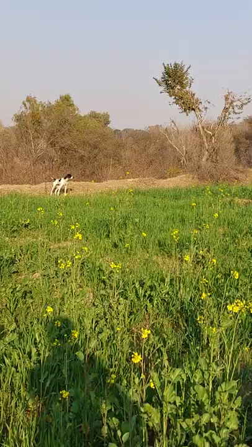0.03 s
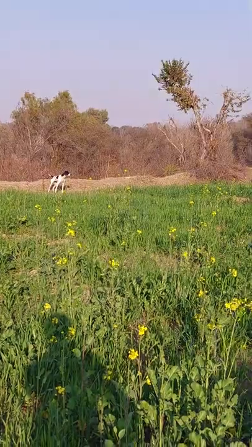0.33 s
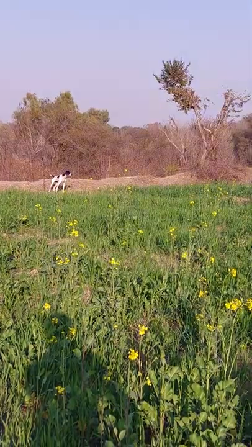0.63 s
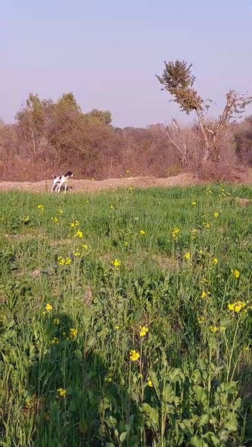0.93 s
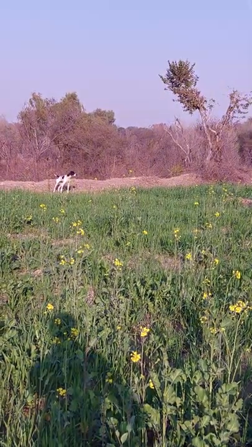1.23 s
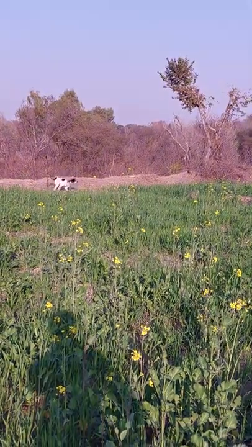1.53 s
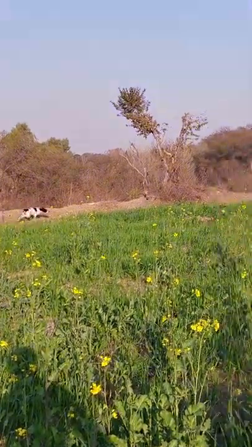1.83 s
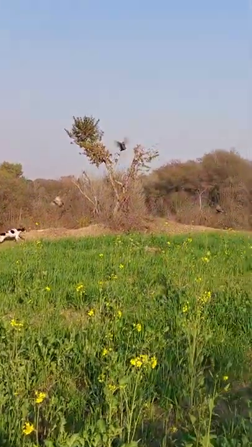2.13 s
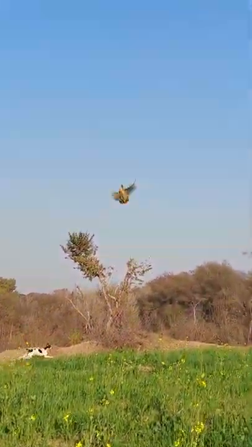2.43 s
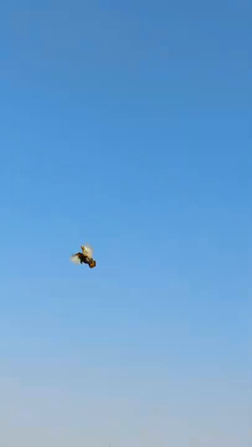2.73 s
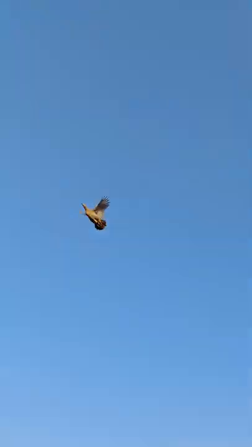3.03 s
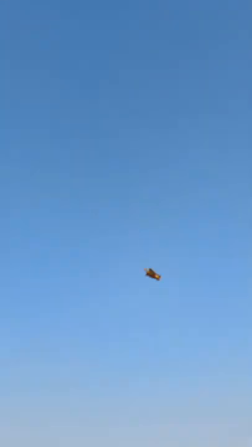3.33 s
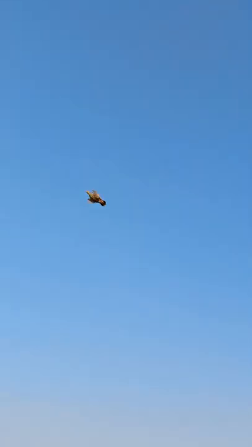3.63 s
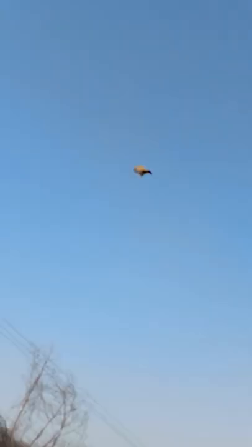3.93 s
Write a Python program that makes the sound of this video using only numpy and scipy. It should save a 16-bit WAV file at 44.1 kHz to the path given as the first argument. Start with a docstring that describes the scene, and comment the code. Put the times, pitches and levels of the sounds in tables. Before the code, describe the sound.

Birds take off with a rapid whirr of wings from about 1.6 to 2.9 seconds, with sharp wing claps between 2 and 2.7 seconds. Low wind and handling rumble run throughout, with dull bumps near 0.7, 1.8, 2.7 and 3.2 seconds. Leaves and clothing rustle softly from 1.6 seconds to the end, over a faint low drone and a wash of open air.

```python
"""First comes a low rumble of wind and fingers on a hand-held phone. Then game birds burst from a crop
field some way off: a whirr of hollow wing puffs, about 19 a second, and sharp claps of wings slapping
together as one climbs overhead. Leaves and clothing rustle as the phone swings up to follow the bird.
Behind it all lie a low drone and the soft wash of open air."""
import sys
import numpy as np
from scipy import signal
from scipy.fft import rfft, irfft
from scipy.io import wavfile
from scipy.ndimage import uniform_filter1d

SR = 44100
rng = np.random.default_rng(int(sys.argv[2]) if len(sys.argv) > 2 else 0)


def to_wav(sig):
    """Store sig (one row per channel, or 1-D mono) as 16-bit WAV at the path in sys.argv[1].

    Samples outside -1..1 are clipped; the rate is SR.
    """
    pcm = np.clip(np.atleast_2d(sig), -1, 1) * 32767
    pcm = np.round(pcm).astype(np.int16)
    wavfile.write(sys.argv[1], SR, pcm.T)  # frames by channels


N = 176400  # 4 seconds

# wing strokes, plus one knock at 2.301 s played the same way: t/s, peak level/dB, f/Hz
WING_STROKES = [(1.562, -49, 536), (1.612, -44, 580), (1.664, -43, 650), (1.769, -36.5, 678),
                (1.821, -43, 626), (1.873, -46, 670), (1.927, -38, 627), (1.979, -32.5, 640),
                (2.086, -41.5, 600), (2.138, -45.5, 547), (2.196, -44.5, 560), (2.301, -42, 854),
                (2.405, -48, 616), (2.567, -50, 610), (2.727, -43, 607), (2.781, -44, 650),
                (2.833, -48, 646), (2.892, -45, 620)]


def wing_whirr():
    """Every wing stroke pushes out a hollow puff of air that falls in pitch; a knock at 2.3 s is played the
    same way."""
    return sum(amp(db) * puff(at, hz, width_s=0.0025, glide_per_s=-15) for at, db, hz in WING_STROKES)


# wing claps: t/s, level/dB, f/Hz, rattle compared with its clap/dB
WING_CLAPS = [(2.0430, -41, 1360, -14.5), (2.1550, -37.5, 1810, -10), (2.2983, -36, 1110, -12.5),
              (2.4423, -35, 1140, -14), (2.4540, -39, 1290, -11), (2.6261, -34.5, 1200, -10),
              (2.6313, -35.5, 1770, -16), (2.6373, -40, 810, -24), (2.6753, -38, 850, -13),
              (2.7020, -44, 900, -9)]
# tone of rattling feathers: f/Hz, level/dB
FEATHER_TONE = [(300, -11), (600, 2), (850, 4), (1300, 6), (1800, -1.5), (2350, 4.5), (3100, -10.5),
                (8000, -28)]


def wing_claps():
    """Wings slap together: a sudden pulse with a bright crack, then a dying rattle of feathers."""
    rise_s, decay_s = .00035, .0011
    crack_hz, crack_db = 2250, -9
    rattle_decay_s, tail_decay_s, tail_db = 0.011, 0.086, -17
    slaps = rattle = 0
    for at, db, hz, rattle_db in WING_CLAPS:
        t = seconds() - at
        before, after = np.minimum(t, 0), np.maximum(t, 0)
        shape = np.exp(-.5 * (before / rise_s) ** 2 - after / decay_s)
        crack = amp(crack_db) * np.cos(2 * np.pi * crack_hz * t)
        slaps -= amp(db) * shape * (np.cos(2 * np.pi * hz * t) + crack)
        fade = np.exp(-after / rattle_decay_s) + amp(tail_db) * np.exp(-after / tail_decay_s)
        rattle += amp(db + rattle_db) * (t > 0) * fade
    feathers = noise(FEATHER_TONE) + amp(-12) * left_hiss()
    return slaps + rattle * feathers * flicker(per_s=700, depth_db=2)


# tone of the wind: f/Hz, level/dB
WIND_TONE = [(35, -19), (48, -11.5), (62, 1.5), (74, -4), (90, -4.5), (105, -11.5), (140, -14),
             (250, -36.5), (500, -56.5)]
# gusts: t/s, level/dB
WIND_LEVEL = [(.16, -46.5), (.5, -42), (.58, -45), (.66, -39.5), (.86, -38), (1.1, -45.5), (1.38, -47.5),
              (1.62, -45), (1.78, -39), (1.98, -43), (2.15, -45.5), (2.48, -49), (2.7, -41.5), (3.0, -48.5),
              (3.55, -52), (3.75, -48.5)]


def wind():
    """Wind beats on the microphones with a low flutter."""
    return rumble_noise(WIND_TONE) * fader(WIND_LEVEL) * flicker(per_s=32, depth_db=3)


# tone of the rubbed phone case: f/Hz, level/dB
CASE_TONE = [(70, 1.5), (105, -3), (135, 4), (160, -0.5), (185, -7.5), (250, -8), (330, -15.5), (450, -21),
             (800, -27)]
# loudness of the rubbing: t/s, level/dB
CASE_LEVEL = [(.16, -46.5), (.55, -49), (.73, -45), (1.1, -49.5), (1.45, -50.5), (1.75, -45), (2.1, -51),
              (3.3, -48.5), (3.53, -54), (4, -52.5)]
# thumps: t/s, peak level/dB, f/Hz
THUMPS = [(.735, -30, 147), (0.739, -39.5, 297), (.845, -34, 62), (1.753, -33, 83), (2.702, -33.5, 82),
          (3.181, -30, 69)]


def handling():
    """A hand rubs the phone's case, and hand or wind thumps it."""
    rubbing = rumble_noise(CASE_TONE) * fader(CASE_LEVEL)
    thumps = sum(amp(db) * puff(at, hz, width_s=0.43 / hz) for at, db, hz in THUMPS)
    return rubbing + thumps


# tone of brushed leaves: f/Hz, level/dB
LEAF_TONE = [(400, -4), (750, 0), (950, -2.5), (1100, 4.5), (1400, -7.5), (1700, -4.5), (2100, -2.5),
             (2900, -15), (4000, -14.5), (7500, -27), (10000, -30.5), (15000, -44)]
# pitches that ring in the leaves: f/Hz, width/Hz, level compared with the broad rustle/dB
LEAF_RINGS = [(1067, 61, -8.5), (1280, 69, -13)]
# loudness of the leaves: t/s, level/dB
LEAF_LEVEL = [(.14, -66.5), (.6, -74), (.85, -63), (1.3, -72), (1.65, -56.5), (1.95, -57.5), (2.15, -55.5),
              (2.55, -57.5), (2.68, -54), (2.8, -55), (3.3, -57), (3.55, -58), (4, -59)]
# tone of rubbing cloth: f/Hz, level/dB
CLOTH_TONE = [(1500, -24), (3000, 5), (5000, 1), (7500, 1), (10200, -8), (11500, -2.5), (15500, -3.5)]
# loudness of the cloth: t/s, level/dB
CLOTH_LEVEL = [(.14, -86.5), (1.36, -81.5), (1.55, -76), (1.8, -67), (1.97, -76), (2.48, -72), (2.66, -60),
               (3.0, -67.5), (3.55, -66), (3.76, -72.5)]


def rustle():
    """Leaves and cloth rub and tick as the phone turns after the birds."""
    ticks_per_s, tick_gain_db = 93, 9
    leaves = stereo_noise(LEAF_TONE, LEAF_RINGS) * fader(LEAF_LEVEL) * flicker(per_s=70, depth_db=1.25)
    ticks = (rng.random(N) < ticks_per_s / SR) * rng.standard_normal((2, N)) * amp(tick_gain_db)
    cloth = stereo_noise(CLOTH_TONE) * flicker(per_s=110, depth_db=2.5) + tint(ticks, CLOTH_TONE)
    uneven_strokes = flicker(per_s=16, depth_db=2.13)
    return (leaves + cloth * fader(CLOTH_LEVEL)) * uneven_strokes


# single swishes: t/s, level/dB, half-width/s, f/Hz, left minus right/dB
SWISHES = [(1.61, -67, 0.012, 5600, 1), (2.90, -68, 0.037, 7860, -5), (3.15, -64.5, 0.047, 4060, -1),
           (3.455, -69, 0.018, 13100, -6), (3.61, -64, 0.023, 4900, 0), (3.929, -54.5, 0.029, 404, 0)]


def swishes():
    """A sleeve sweeps past leaves: each time a band of hiss swells and dies."""
    edge_db = -14.5  # an octave either side of the middle
    sound = 0
    for at, db, width_s, hz, lean_db in SWISHES:
        hiss = stereo_noise([(hz / 2, edge_db), (hz, 0), (hz * 2, edge_db)])
        sound += amp(db) * pan(lean_db) * bell(seconds() - at, width_s) * hiss
    return sound


# snapping stalks: t/s, level/dB, decay/s, left minus right/dB
STALK_SNAPS = [(1.6762, -54, 0.0055, 8), (3.925, -68, 0.016, -6)]


def stalk_snaps():
    """Dry stalks crackle in quick bursts of hiss, as bright as the cloth."""
    t, bursts = seconds(), 0
    for at, db, decay_s, lean_db in STALK_SNAPS:
        fade = (t > at) * np.exp(-np.maximum(t - at, 0) / decay_s)
        bursts += amp(db) * pan(lean_db) * fade
    return bursts * stereo_noise(CLOTH_TONE)


# notes of the squeak: f/Hz, peak level/dB
SQUEAK_NOTES = [(2460, -55), (2800, -56)]


def squeak():
    """Something rubs and gives one short, unsteady squeak."""
    at_s, pitch_wobble = 2.680, 0.018
    notes = 0
    for hz, db in SQUEAK_NOTES:
        pitch = hz * (1 + pitch_wobble * noise([(60, 0), (300, 0)]))
        notes += amp(db) * sine(pitch)
    return notes * bell(seconds() - at_s, width_s=0.016)


# notes of the drone: f/Hz, level added to DRONE_LEVEL/dB
DRONE_NOTES = [(90, -6.5), (121, -1), (149, 2), (208, -15), (256, -11.5), (302, -17)]
# loudness of the drone: t/s, level/dB
DRONE_LEVEL = [(1.0, -58), (2.2, -52), (3.33, -49), (3.53, -61), (3.7, -51)]


def drone():
    """Low notes, perhaps of a far-off engine, waver in pitch and fade in and out on each side."""
    notes = 0
    for hz, db in DRONE_NOTES:
        pitch = hz * flicker(per_s=12, depth_db=0.27)
        fade = np.array([flicker(per_s=12, depth_db=4.5) for _ in range(2)])
        notes += amp(db) * fade * sine(pitch)
    return notes * fader(DRONE_LEVEL)


# tone of the air over the field: f/Hz, level/dB
AIR_TONE = [(200, -6.5), (330, 1.5), (470, 1), (620, 1.5), (850, 0.5), (1100, -1.5), (1500, -2),
            (2300, -6.5), (2900, -20.5), (4000, -42), (6000, -32.5), (8500, -27.5), (10500, -36),
            (15500, -32.5)]
# loudness of the air: t/s, level/dB
AIR_LEVEL = [(.14, -59.5), (.6, -60), (.85, -56.5), (1.2, -58.5), (1.5, -59.5), (2.8, -56.5), (3.4, -59.5),
             (4, -59)]
# loudness of the faint hiss: t/s, level/dB
HISS_LEVEL = [(.14, -72.5), (1.4, -75.5), (1.62, -65), (1.95, -68.5), (2.7, -73), (3.2, -73), (4, -72)]


def open_air():
    """A dull wash of open air, with a faint hiss on the left."""
    return stereo_noise(AIR_TONE) * fader(AIR_LEVEL) + left_hiss() * fader(HISS_LEVEL)


# tone of the high hiss: f/Hz, level/dB
HISS_TONE = [(1800, 6.5), (3000, -8), (5800, -4), (8500, -5), (11000, -21), (15000, -30)]


def left_hiss():
    """A high hiss in the left microphone only."""
    return noise(HISS_TONE) * np.array([[1], [0]])


# the rumble as the phone turns: t/s, likeness of the two sides (0 to 1), left minus right/dB
PHONE_TURN = [(.2, 0.59, 1), (1.85, 0.8, 1.5), (2.15, 0.94, -0.5), (2.55, 0.96, 0), (2.75, 0.41, -0.5),
              (3.15, 0.8, 2), (3.45, 0.92, 0.5)]


def rumble_noise(tone):
    """Steady noise whose two sides grow more or less alike as the phone turns."""
    times, likeness, _ = np.array(PHONE_TURN).T
    likeness = np.interp(seconds(), times, likeness)
    shared, left, right = (noise(tone) for _ in range(3))
    both = np.sqrt(likeness) * shared + np.sqrt(1 - likeness) * np.array([left, right])
    power = uniform_filter1d(np.mean(both ** 2, axis=0), int(0.11 * SR))
    return both / np.sqrt(power)  # evens out slow swells


def turning_pan():
    """Left and right gains that shift as the phone turns."""
    times, _, lean_db = np.array(PHONE_TURN).T
    return pan(np.interp(seconds(), times, lean_db))


# how alike the two microphones hear sound from all around: f/Hz, likeness (-1 to 1)
MIC_LIKENESS = [(300, 0.57), (600, 0.78), (1050, 0.8), (1600, 0.45), (2400, 0.15), (3600, 0.036),
                (7000, 0.073), (9000, 0.64), (12000, 0.057)]


def stereo_noise(tone, rings=()):
    """Noise at two spaced microphones: alike in the lows, mostly unrelated in the highs."""
    hz, likeness = np.array(MIC_LIKENESS).T
    shared = tint(noise(tone, rings), np.c_[hz, 10 * np.log10((1 + likeness) / 2)])
    opposite = tint(noise(tone, rings), np.c_[hz, 10 * np.log10((1 - likeness) / 2)])
    return np.array([shared + opposite, shared - opposite])


def noise(tone, rings=()):
    """Noise of strength (rms) 1, shaped by a tone table and any narrow ringing pitches."""
    hz, db = np.array(tone).T
    f = np.maximum(np.fft.rfftfreq(N, 1 / SR), 1)
    beyond = np.abs(np.log(f / np.clip(f, hz[0], hz[-1])))  # how far outside the table
    power = amp(np.interp(np.log(f), np.log(hz), db) - 40 * beyond) ** 2
    power /= power.sum()
    for centre_hz, width_hz, ring_db in rings:
        peak = 1 / (1 + ((f - centre_hz) / width_hz * 2) ** 2) ** 2
        power += amp(ring_db) ** 2 * peak / peak.sum()
    sound = irfft(rfft(rng.standard_normal(N)) * np.sqrt(power), N)
    return sound / sound.std()


def tint(sound, tone):
    """Turns pitches up or down along (f/Hz, level/dB) points."""
    hz, db = np.array(tone).T
    f = np.fft.rfftfreq(N, 1 / SR) + 1
    return irfft(rfft(sound) * amp(np.interp(np.log(f), np.log(hz), db)), N)


def puff(at, hz, width_s, glide_per_s=0):
    """A pulse of suction that swings briefly back and forth."""
    t = seconds() - at
    return -bell(t, width_s) * np.cos(2 * np.pi * hz * t * (1 + glide_per_s * t / 2))


def bell(t, width_s):
    """A smooth rise and fall, highest at t = 0."""
    return np.exp(-.5 * (t / width_s) ** 2)


def sine(hz):
    """A pure note that follows a changing pitch."""
    return np.sin(2 * np.pi * np.cumsum(hz) / SR)


def flicker(per_s, depth_db):
    """A gain that wanders smoothly at random."""
    hold = int(SR / per_s)
    steps = np.repeat(rng.standard_normal(N // hold + 1), hold)
    return amp(depth_db * uniform_filter1d(uniform_filter1d(steps, hold), hold)[:N])


def fader(points):
    """A gain that follows (t/s, level/dB) points."""
    return amp(np.interp(seconds(), *np.array(points).T))


def pan(lean_db):
    """Left and right gains; above 0 dB the left is louder."""
    return amp(np.array([[1], [-1]]) * lean_db / 2)


def amp(db):
    """Turns decibels into a gain, the number a sound is multiplied by."""
    return 10 ** (np.asarray(db) / 20)


def seconds():
    """The time of every sample."""
    return np.arange(N) / SR


def scene():
    """Birds over the field, with the noises close to the phone."""
    birds = wing_whirr() + wing_claps()
    rumble = (wind() + handling() + drone()) * turning_pan()
    return birds + rumble + open_air() + rustle() + swishes() + squeak() + stalk_snaps()


# tone of one microphone against the other: f/Hz, left minus right/dB
MIC_BALANCE = [(500, -0.5), (1400, 0), (2100, -2), (3200, 1.2), (6200, 2), (9000, 0), (13000, -1)]


def record(dry):
    """Each microphone adds its own tone and opens after a short silence; the highest treble is cut."""
    start_s, top_hz = .1415, 15750
    hz, db = np.array(MIC_BALANCE).T
    heard = np.array([tint(dry[0], np.c_[hz, db / 2]), tint(dry[1], np.c_[hz, -db / 2])])
    treble_cut = signal.ellip(10, .2, 70, top_hz, fs=SR, output="sos")
    return signal.sosfilt(treble_cut, heard * (seconds() >= start_s))


dry = scene()
out = record(dry)
to_wav(out)
```